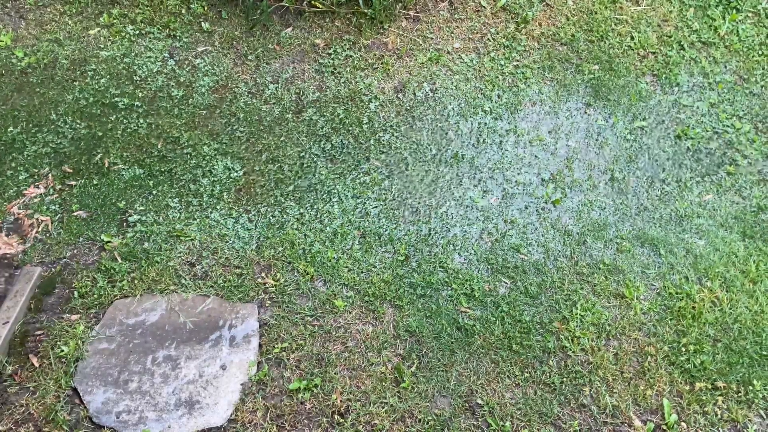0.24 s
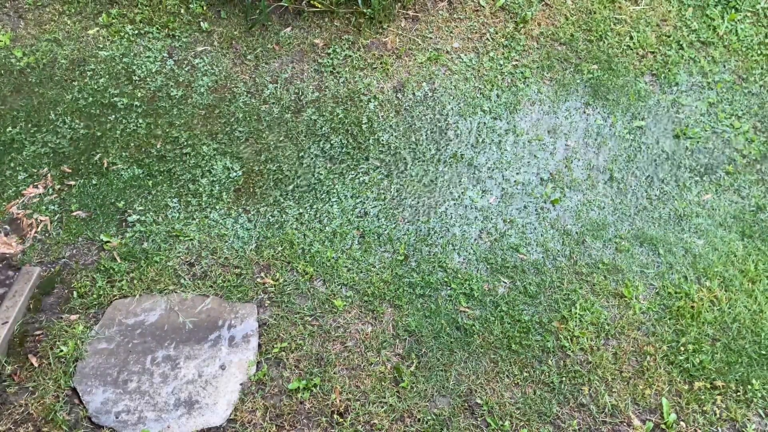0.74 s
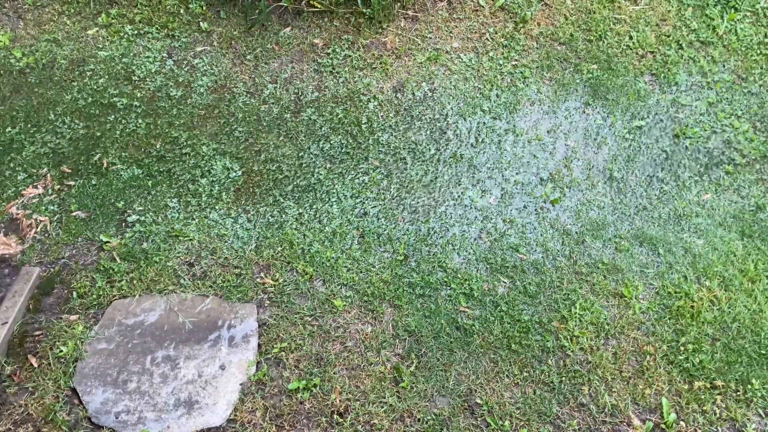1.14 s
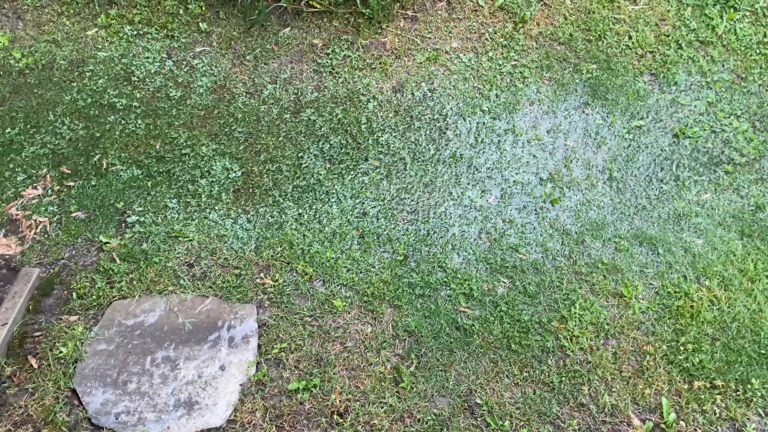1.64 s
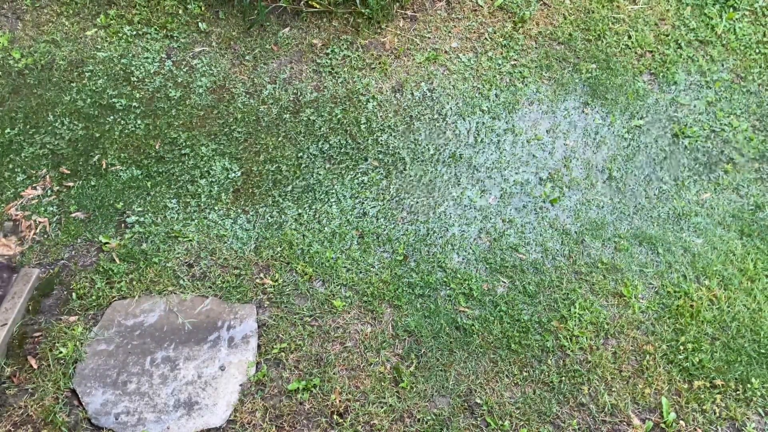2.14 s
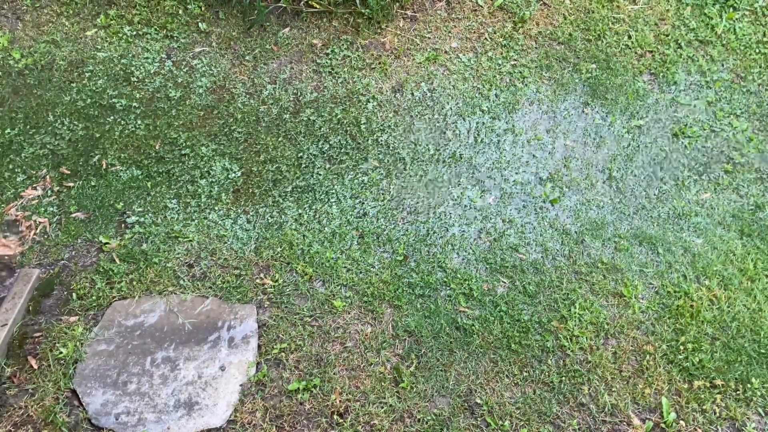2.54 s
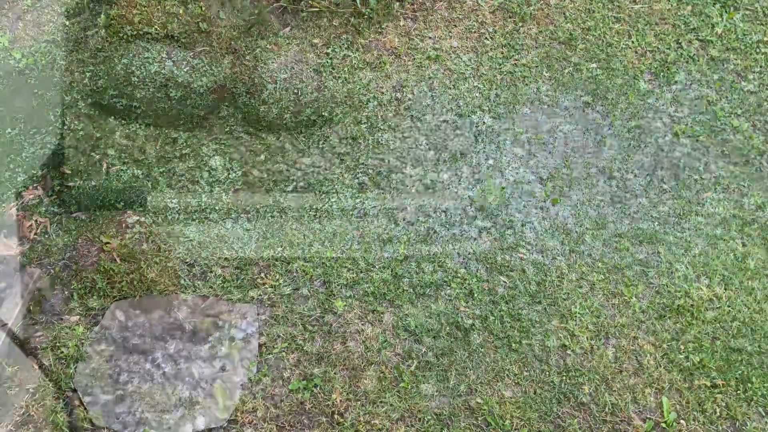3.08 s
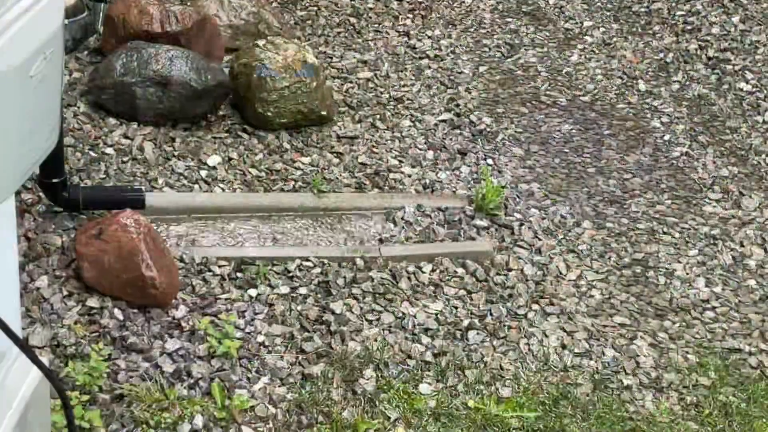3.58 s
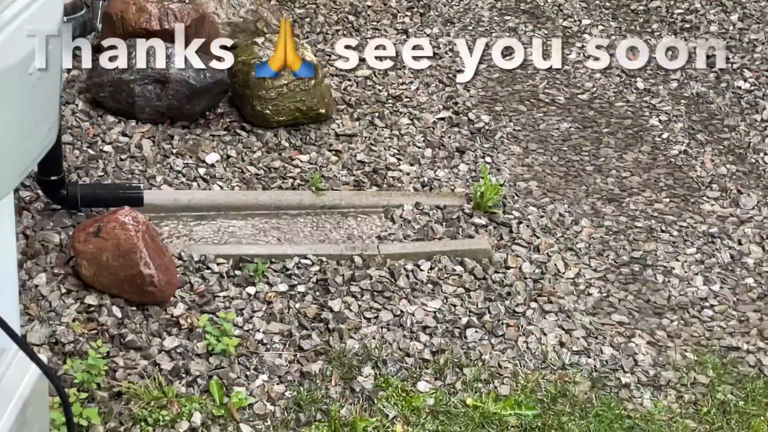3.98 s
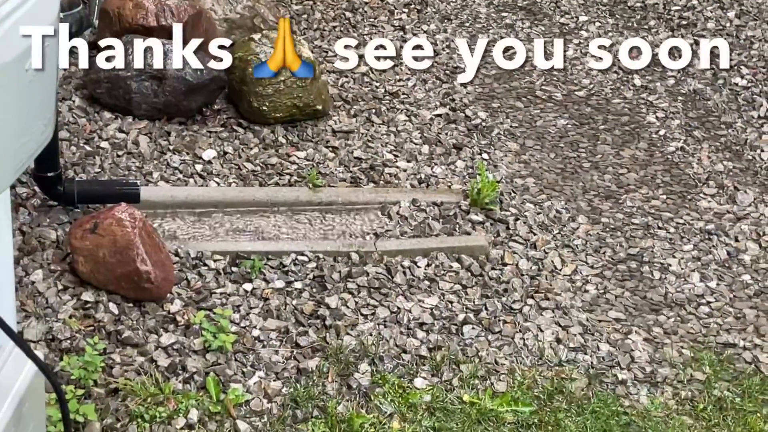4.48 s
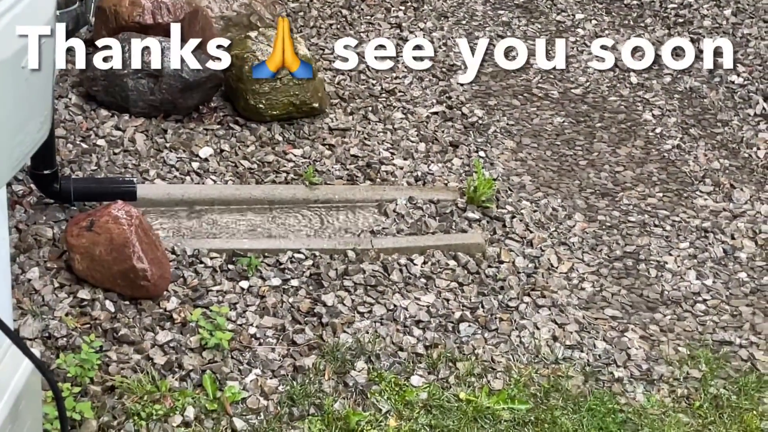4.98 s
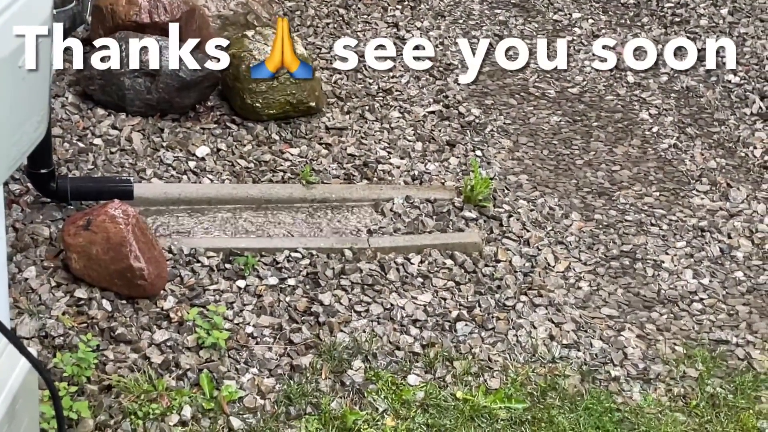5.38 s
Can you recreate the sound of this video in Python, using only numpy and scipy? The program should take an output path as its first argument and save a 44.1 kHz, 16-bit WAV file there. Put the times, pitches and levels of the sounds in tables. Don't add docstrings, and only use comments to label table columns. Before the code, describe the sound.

Rain in a yard with a small bird's repeated rasping chirps, plinking drips, a passing car's hiss and a single loud click.

```python
import sys
import numpy as np
from scipy import signal
from scipy.fft import rfft, irfft, next_fast_len
from scipy.io import wavfile
from scipy.ndimage import uniform_filter1d

SR = 44100
rng = np.random.default_rng(int(sys.argv[2]) if len(sys.argv) > 2 else 0)


def transcribe(u):
    v = np.clip(np.atleast_2d(u).T, -1, 1)
    q = np.round(v * 32767).astype(np.int16)
    wavfile.write(sys.argv[1], SR, q)


def gain_from_db(level_db):
    decades = np.asarray(level_db, float) / 20
    return 10 ** decades


N = 247878


def shape(x, gain):
    size = next_fast_len(N, True)
    return irfft(rfft(x, size) * gain(np.fft.rfftfreq(size, 1 / SR)), size)[..., :N]


def colour(x, table):
    hz, db = np.transpose(table)
    return shape(x, lambda f: gain_from_db(np.interp(np.log(f + 1), np.log(hz), db)))


def curve(s, values):
    return np.interp(np.arange(N) / SR, s, values)


def walk(rate):
    count = int(N * rate / SR) + 2
    return curve(np.arange(count) / rate, 1.165 * rng.standard_normal(count))


def add(track, s, sound):
    i = int(s * SR)
    sound = sound[..., max(-i, 0):N - i]
    start = max(i, 0)
    track[..., start:start + sound.shape[-1]] += sound


def ports(common, other, table):
    hz, lag, alike = np.transpose(table)

    def likeness(f):
        return np.clip(np.interp(f, hz, alike), 0, 1)

    mid = shape(common, lambda f: np.sqrt((1 + likeness(f)) / 2))
    side = shape(other, lambda f: np.sqrt((1 - likeness(f)) / 2))
    pair = np.array([mid + side, mid - side])
    return shape(pair, lambda f: np.exp(np.outer([.5j, -.5j], np.interp(f, hz, lag))))


# time in seconds, level in dB.
RAIN_LEVEL = [(0, 1.8), (1, 1), (2.85, 0.5), (3.3, -3.5), (3.35, .5), (3.47, -1.5), (3.75, -.5), (3.95, 0.5),
              (4.25, -1), (5.62, -1.4)]


def rain_gain():
    return gain_from_db(curve(*np.transpose(RAIN_LEVEL)))


def patter(rate, spread_db, share_db, flicker_db):
    out, swell = 0, walk(7)
    for octave in range(4, 15):
        count = int(rate * 2. ** (octave - 14) * 2 * N / SR) + 1
        tick_db = np.minimum(spread_db * rng.exponential(size=count), 3 * spread_db)
        ticks = gain_from_db(tick_db) * rng.standard_normal(count)
        band = rng.standard_normal(2 * N)
        tick_gain = gain_from_db(share_db) * np.sqrt(2 * N / np.sum(ticks ** 2))
        band[rng.integers(0, 2 * N, count)] += ticks * tick_gain
        band = shape(band.reshape(2, N),
                     lambda f: np.sqrt(np.clip(1 - abs(np.log2(f + 1) - octave), 0, 1)))
        out = out + band * gain_from_db(flicker_db * (walk(14) + 0.53 * swell))
    return out * np.sqrt(SR / 2)


def splashes(drops, tail_s, db):
    track = np.zeros(N)
    t = np.arange(int(.04 * SR)) / SR
    for s, peak_db, low_db in drops:
        spray = rng.standard_normal(len(t)) * np.exp(-t / tail_s)
        low = uniform_filter1d(spray, size=5)
        add(track, s, gain_from_db(peak_db + db) * (spray - low + gain_from_db(low_db - 11.5) * low))
    return colour(track, [(400, -16), (1500, 4.5), (7000, 9.5), (15000, -8)])


# frequency in Hz, density in dB per Hz.
GRASS_SPECTRUM = [(100, -100), (350, -80), (600, -77), (1200, -81), (2200, -81), (3100, -77.5), (4200, -82),
                  (5500, -84.5), (7500, -87.5), (11000, -95.5), (13000, -101.5), (14600, -106),
                  (15600, -98)]
# frequency in Hz, lag of the right in radians, likeness 0-1.
BASS_PORTS = (90, -.2, .84)
GRASS_PORTS = [BASS_PORTS, (270, -0.4, 1), (810, -2.1, 0.054), (2200, 0.2, 0.35), (3060, -3.5, 0.22),
               (5230, -6, 0.5), (7600, -3, 0.81), (11060, 0, 0.7), (12100, 0.78, 0.98), (13670, 3.4, 0.94),
               (16700, 3.1, 0.8), (15600, 4, 0.83)]
# start in seconds, peak in dB, weight of the lows in dB.
GRASS_DROPS = [(0.0912, -46, -3), (0.1531, -43, -5), (0.2039, -44, -7), (0.603, -46, 6), (1.0196, -43, -1),
               (1.274, -45, -4), (1.2815, -47, -6), (1.3643, -39, 17), (1.5055, -42, -8), (1.5673, -43, -3),
               (1.728, -44.5, -3), (1.8836, -40, 2), (1.9584, -52, -4), (2.0398, -46, -7),
               (2.391, -43.5, 0), (2.7082, -43, 9)]


def grass_spot(road, strays):
    rain = patter(rate=1600, spread_db=2.4, share_db=-10.0, flicker_db=1.47)
    common, other = colour(rain, GRASS_SPECTRUM) * rain_gain() + road
    near = splashes(GRASS_DROPS, tail_s=0.0054, db=2.0)
    return ports(common + near + strays, other, GRASS_PORTS)


# time in seconds, level in dB.
TRAFFIC = [(0, -47.5), (.3, -49), (.72, -47.5), (1.4, -47.5), (2.3, -50.5), (2.75, -46.5), (3.15, -53),
           (3.57, -46), (3.9, -52), (4.24, -46), (4.41, -58), (4.65, -46.5), (5.2, -58), (5.62, -47.5)]
# frequency in Hz, density in dB per Hz.
RUMBLE = [(20, -24), (35, -15), (60, 0), (110, -5), (150, -8.5), (250, -38)]
GROWL = [(90, -16), (160, -0.5), (260, 6), (400, -13.5), (600, -19)]
DRONE = [(700, -19), (900, -3), (1050, -1.5), (1150, -7), (1300, -46.5)]


def traffic():
    swell, t = curve(*np.transpose(TRAFFIC)), np.arange(N) / SR
    growl = -53.5 + (swell - swell.mean()) - 1.06 * (t - 2.8)
    drone = -48.5 - 5 * t - curve([1.7, 2.4], [0, 25])
    out = 0
    for table, db in zip((RUMBLE, GROWL, DRONE), (swell + 2.2, growl + 1.3, drone)):
        band = colour(rng.standard_normal((2, N)), table)
        out = out + band / band.std() * gain_from_db(db + 1.8 * walk(9))
    return out


def chatter():
    after = np.linspace(.04, .16, 11)
    stroke_s, gap_s, sweep_hz = .008, .011, 1100
    late, key, way, db = rng.standard_normal((len(after), 4)).T
    hz = 4684 - 5520 * (after - after[0]) + 250 * key
    half_sweep = np.sign(way - .4) * sweep_hz / 2
    lengths = np.full(len(after), stroke_s)
    return zip(after + .3 * gap_s * late, lengths, hz - half_sweep, hz + half_sweep, -10.5 + 3.0 * db)


def call_notes(chirp, calls, rise, fall):
    chirp_s, chirp_hz = .15, 5150
    for s, span, held_hz, head_db, tail_db in calls:
        pace, key = span / chirp_s, held_hz / chirp_hz
        for after, length, start, end, db in [*chirp, *chatter()]:
            middle = start + (end - start) * (rise if end > start else fall)
            call_db = np.interp(after, [-.01, 0, 0.026, 0.044], [tail_db, head_db, head_db, tail_db])
            yield s + after * pace, length * pace, start * key, middle * key, end * key, db + call_db


# time after the first upstroke in seconds, length in seconds, start in Hz, end in Hz, level in dB.
GRASS_CHIRP = [(-.04, .054, 6380, 5520, -19), (-.036, .05, 3260, 3780, -13.5),
               (0, 0.00906, 3700, 4850, -3.5), (.009, .025, 5120, 5120, -1), (.016, .014, 5700, 5780, -11),
               (.033, .007, 5100, 4300, -8), (.035, .022, 4180, 3895, -0.5), (.053, .024, 5200, 4700, -5),
               (.062, .023, 3874, 3620, -0.5), (.076, 0.024, 3590, 4410, -4.5),
               (.083, 0.016, 4470, 4470, -2.5), (.091, 0.022, 4140, 3460, -6),
               (.103, 0.013, 3950, 3820, -23), (.128, 0.026, 3350, 4320, -2.5),
               (.146, .019, 4250, 3364, -10.5)]
GRAVEL_CHIRP = [(-.031, 0.045, 3330, 3650, -18), (-.032, 0.038, 6640, 7000, -14.5),
                (0, .011, 3670, 4650, -8.5), (.003, .025, 5720, 5640, -8), (.011, 0.02, 5190, 5100, -1),
                (.026, 0.023, 5000, 4900, -7), (.03, .008, 4300, 3920, 0), (.038, 0.027, 4250, 3390, -4.5),
                (.049, 0.034, 5000, 4660, -8), (.066, 0.0216, 3380, 4560, -1), (.077, .016, 4620, 4300, -8),
                (.086, .02, 4440, 3340, -8), (.094, 0.018, 4240, 3150, -2), (.109, 0.015, 4300, 4200, -9),
                (.121, 0.027, 3120, 4120, -6), (.148, 0.0195, 3715, 3020, -6.5)]
# start in seconds, span in seconds, held note in Hz, head level in dB, tail level in dB.
GRASS_CALLS = [
    (-.044, .15, 5114, -19.5, -24.5),
    (.624, .15, 5140, -25.5, -27),
    (1.312, .146, 5080, -28, -25.5),
    (2.44, .146, 5167, -21.5, -27),
]
GRAVEL_CALLS = [
    (3.437, .147, 5166, -25, -26),
    (4.429, .152, 5200, -47, -32),
]
# delay in seconds, level in dB.
WALLS = [
    (.009, -12),
    (.06, -25),
]


def bird():
    voice, waver, flutter = np.zeros(N), walk(420), walk(380)
    sung = [*call_notes(GRASS_CHIRP, GRASS_CALLS, rise=0.426, fall=.55),
            *call_notes(GRAVEL_CHIRP, GRAVEL_CALLS, rise=0.281, fall=0.754)]
    for s, length, start, middle, end, db in sung:
        u = np.arange(int(1.2 * length * SR)) / (1.2 * length * SR)
        hz = start * (1 - u) * (1 - 2 * u) + 4 * middle * u * (1 - u) + end * u * (2 * u - 1)
        rasp = min(.006 + .3 * abs(start - end) / middle, .04)
        i = int(abs(s) * SR)
        hz *= 1 + rasp * waver[i:][:len(u)]
        db = db + 85 * rasp * flutter[i:][:len(u)]
        tone = np.sin(2 * np.pi * np.cumsum(hz) / SR)
        add(voice, s - .1 * length, gain_from_db(db + 1.03) * np.sin(np.pi * u) ** 0.5 * tone)
    direct = voice.copy()
    for delay, db in WALLS:
        add(voice, delay, gain_from_db(db) * direct)
    t = np.arange(int(.3 * SR)) / SR
    echoes = []
    for _ in range(2):
        scatter = rng.standard_normal(len(t)) * np.exp(-t / .05) * (t > .003)
        echoes.append(signal.fftconvolve(voice, scatter)[:N])
    return voice + gain_from_db(-41) * echoes[0], .15 * voice + gain_from_db(-35) * echoes[1]


# frequency in Hz, lag in radians, likeness 0-1.
BIRD_PORTS = [(3040, -2.5, 0.4), (4200, -1.7, 0.48), (5200, -0.94, 0.77)]


def bird_at_ports(first, second):
    voice, echo = bird()
    return first * ports(voice, echo, BIRD_PORTS) + second * ports(voice, echo, GRAVEL_PORTS)


def ping(hz, cycles, glide):
    turns = np.arange(int(4 * cycles * SR / hz)) * hz / SR
    return np.exp(-turns / cycles) * np.sin(2 * np.pi * turns * (1 + glide * turns / cycles))


def rings(events, cycles, glide, db):
    track = np.zeros(N)
    for s, peak_db, hz in events:
        add(track, s, gain_from_db(peak_db + db) * ping(hz, cycles, glide))
    return track


# start in seconds, peak in dB, pitch in Hz.
THUDS = [(0.428, -31, 68), (0.712, -34, 97.7), (0.831, -28.5, 98), (0.929, -38, 62.5), (1.128, -39, 44.8),
         (1.469, -30.5, 89), (1.675, -34.5, 81), (1.842, -39, 87), (2.17, -39, 70.5), (2.708, -44, 96.9),
         (2.802, -38, 77), (3.036, -42, 56), (3.27, -34, 61), (5.464, -40, 70.0)]


def roof_thuds():
    return rings(THUDS, cycles=3.25, glide=-0.046, db=1.5)


# start in seconds, peak in dB, pitch
# in Hz.
DRIPS = [
    (1.0784, -35, 1890),
    (1.885, -29, 1800),
    (3.1842, -30.5, 2120),
    (4.0736, -22.5, 2220),
    (4.7157, -29, 2120),
    (5.0444, -32, 2000),
    (5.4151, -26, 2320),
         (3.0294, -41, 3570),
    (3.05, -24, 5110),
    (3.5972, -26, 3870),
    (4.8184, -24.5, 3620),
    (4.9524, -21.5, 3740),
    (5.1314, -25, 4770),
    (5.3403, -22.5, 4430),
    (5.3927, -36, 5540),
    (5.5744, -35, 3260),
]


def puddle_drips():
    return rings(DRIPS, cycles=6.5, glide=.02, db=-2)


# frequency in Hz, density in dB per Hz.
GRAVEL_SPECTRUM = [(100, -100), (350, -76.5), (600, -77.5), (1200, -82.5), (2200, -77.5), (3800, -78.5),
                   (5500, -80), (7500, -83), (11000, -89), (13000, -92.5), (15500, -92.5)]
# frequency in Hz, lag of the right in radians, likeness 0-1.
GRAVEL_PORTS = [BASS_PORTS, (310, 0, 0.86), (1410, 0.5, 0.83), (2250, 0, 0.83), (6000, 0, 0.93),
                (8050, -3, 0.82), (11100, -6.5, 0.7), (12300, -6, 0.69), (14100, -9, 0.78),
                (16000, -10, 0.93)]
# start in seconds, peak in dB, weight of the lows in dB.
GRAVEL_DROPS = [(3.16, -44, 9), (3.36, -38, 2), (3.472, -47, -5), (3.5091, -42, -2), (3.5977, -35, 9),
                (3.674, -44, 4), (3.7798, -39, 13), (3.8186, -40, 4), (3.887, -42, -7), (3.9045, -37, -5),
                (3.9584, -35, -9), (4.0587, -49, 3), (4.1171, -38, 9), (4.2158, -42, -8), (4.35, -36, 11.5),
                (4.5466, -40, 9), (4.6219, -38.5, -4), (4.7207, -41.5, -5), (4.7576, -44, 0),
                (4.8654, -40, 4), (4.8973, -43, -1), (4.976, -42, -18), (5.045, -40, 10),
                (5.2967, -38, -13), (5.3914, -36, -11), (5.4376, -46, -4), (5.4595, -41, -12),
                (5.5014, -35, -2.5), (5.5172, -37.5, -4)]


def gravel_spot(road, strays):
    rain = patter(rate=900, spread_db=3.2, share_db=-6.5, flicker_db=1.5)
    common, other = colour(rain, GRAVEL_SPECTRUM) * rain_gain() + road
    near = splashes(GRAVEL_DROPS, tail_s=0.0078, db=0.5)
    return ports(common + near + strays, other, GRAVEL_PORTS)


# frequency in Hz, density in dB per Hz.
TYRES = [(150, -22), (350, -9.5), (600, -2.5), (1000, -1), (1800, -4), (2600, -8.5), (4000, -15.5),
         (6000, -36)]


def car():
    passes_s, nearing_s, leaving_s = 4.292, 0.49, 1
    t = np.arange(N) / SR - passes_s
    along = t / np.where(t < 0, nearing_s, leaving_s)
    hiss = np.array([colour(rng.standard_normal(N) * gain_from_db(0.24 * walk(20)), TYRES) for _ in range(2)])
    db = -34.5 - 29.5 * np.log10(1 + along ** 2)
    db = db - curve([3.1, 3.45], [40, 0])
    pan_db = 0.6 - 0.2 * np.tanh(along)
    return hiss / hiss.std() * gain_from_db(db + 3 + np.outer([.5, -.5], pan_db))


STRIKE_S = 4.3776


def strike():
    out = np.zeros((2, N))
    t = np.arange(int(0.062 * SR)) / SR
    hz = 60 + 260 * np.exp(-t / 0.01) + 1500 * np.exp(-t / 0.0011)
    size = np.exp(-t / .0008) + .27 * np.exp(-(t / .0055) ** 3) + .03 * np.exp(-t / .03)
    bend = np.sin(2 * np.pi * np.cumsum(hz) / SR + 1.9) * (1 - np.exp(-t / .0003)) * size
    add(out, STRIKE_S, gain_from_db(np.array([[5.5], [2.2]])) * bend)
    early = t[:400] - .006
    ring = np.exp(-abs(early) / np.where(early < 0, .0014, .0005)) * np.cos(2 * np.pi * 1880 * early)
    add(out[0], STRIKE_S - .0068, gain_from_db(-1.0) * ring)
    creak = np.hanning(330) * np.sin(2 * np.pi * 600 * t[:330])
    add(out, STRIKE_S - .007, gain_from_db(-16.0) * creak)
    yielding = np.hanning(900) * np.cos(2 * np.pi * 55 * (t[:900] - .01))
    add(out, STRIKE_S + 0.005, gain_from_db(-11.5) * yielding)
    return colour(out, [(2400, -2.6), (3800, -25)])


def scene():
    first = np.sqrt(curve((2.975, 3.42), [1, 0]))
    second = np.sqrt(1 - first ** 2)
    road = traffic()
    strays = roof_thuds() + puddle_drips()
    ground = first * grass_spot(road, strays) + second * gravel_spot(road, strays)
    return ground + bird_at_ports(first, second) + car() + strike()


def top_cut(x):
    return signal.sosfilt(signal.butter(12, 15900, fs=SR, output="sos"), x)


def record(dry):
    duck_db, duck_s = -12, .15
    late = np.arange(N) / SR - STRIKE_S - .012
    duck = gain_from_db(duck_db * (late > 0) * np.exp(-(np.maximum(late, 0) / duck_s) ** 3))
    middle = colour(dry, [(150, -15), (400, -1.0), (1800, -1.0), (4500, -11)])
    return top_cut(middle + duck * (dry - middle))


dry = scene()
out = record(dry)
transcribe(out)
```